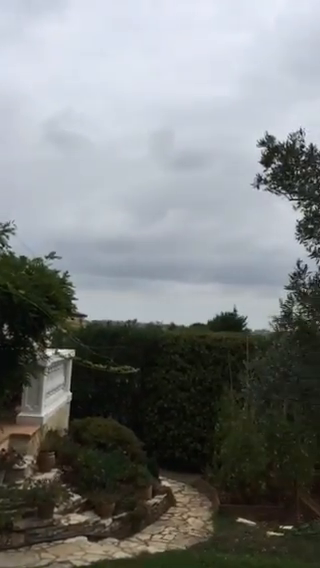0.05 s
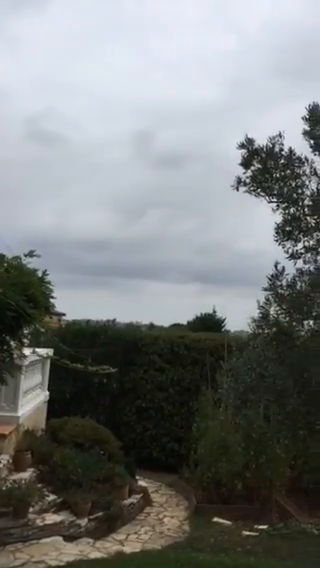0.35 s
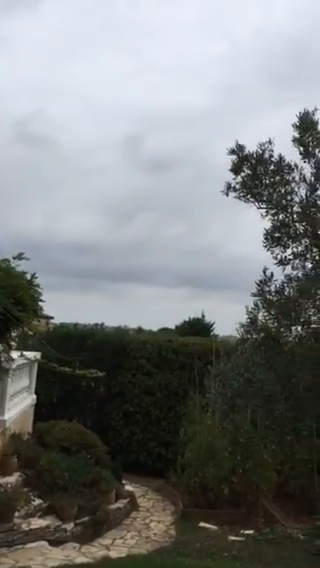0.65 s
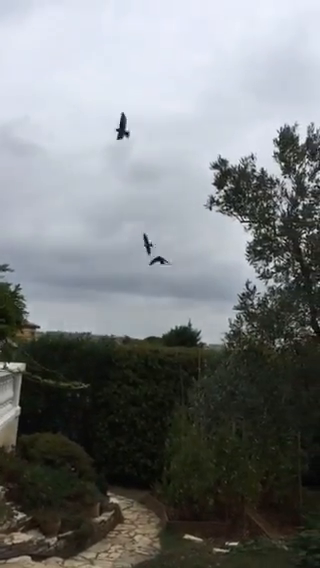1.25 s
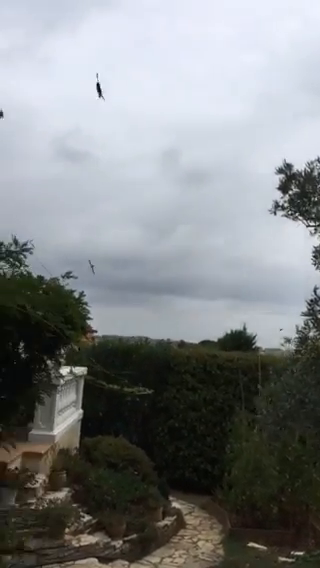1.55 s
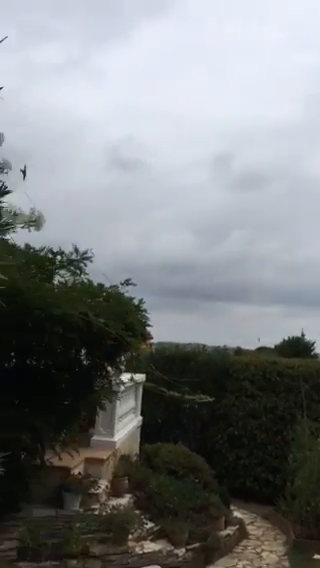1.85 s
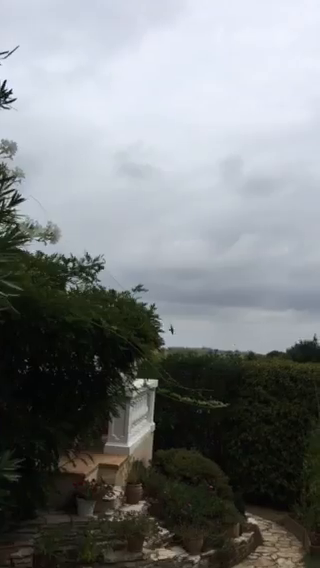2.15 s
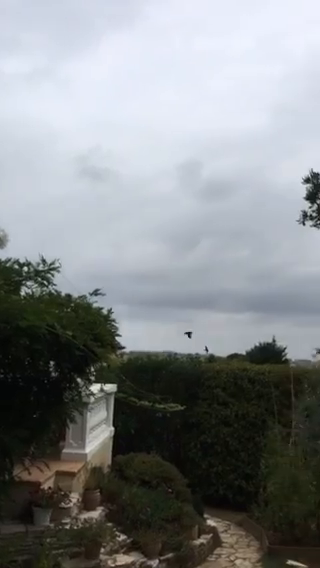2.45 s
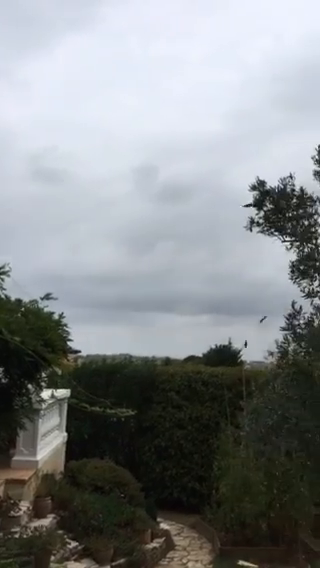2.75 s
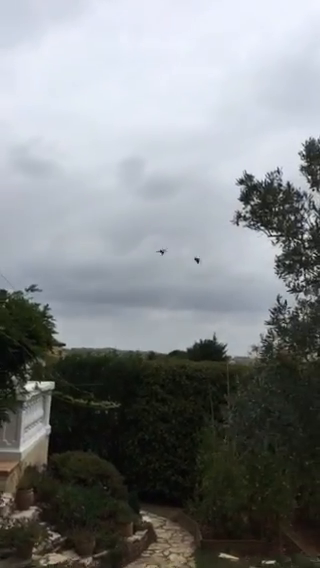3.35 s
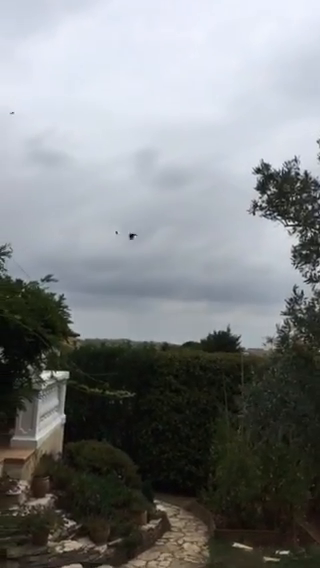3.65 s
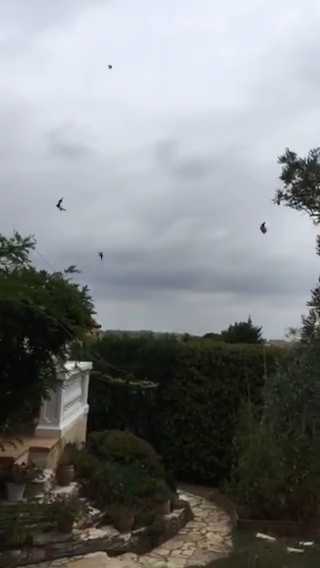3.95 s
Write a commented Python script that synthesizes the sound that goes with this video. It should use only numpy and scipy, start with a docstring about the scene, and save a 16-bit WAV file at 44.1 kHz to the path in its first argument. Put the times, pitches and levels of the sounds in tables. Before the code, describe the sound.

A small nearby bird gives three sharp rising chirps in a garden, at about 1.2, 1.4 and 2.4 seconds. Low wind rumbles and softly thumps the microphone from the start, strongest near 1.1 seconds and easing by 1.5. Another bird answers with faint, thin falling calls around 2.1, 2.8 and 3.4 seconds. Distant birds twitter quietly, mostly in the last second, over a soft steady hush.

```python
"""Wind rumbles over a soft, distant hush and thumps the microphone, each puff ringing a low resonance.
Leaves rustle faintly and small birds twitter far off. A near bird gives three sharp rising chirps,
the two sides of its syrinx sounding together and mixing into combination tones; another answers
with thin falling calls. Garden walls reflect the birdsong, and hedge and trees scatter it."""
import sys
import numpy as np
from scipy import signal
from scipy.fft import rfft, irfft
from scipy.io import wavfile
from scipy.ndimage import uniform_filter1d

SR = 44100
rng = np.random.default_rng(int(sys.argv[2]) if len(sys.argv) > 2 else 0)


def master_out(mix):
    """Clip the mix to full scale and print it as 16-bit PCM to the path in sys.argv[1]."""
    frames = np.transpose(np.atleast_2d(mix))
    ceiling = np.clip(frames, -1, 1)
    pcm = np.round(ceiling * 32767).astype(np.int16)
    wavfile.write(sys.argv[1], SR, pcm)


N = 176400


def gain(db):
    """Amplitude ratio of a level: a factor of ten for every 20 dB."""
    return 10 ** (np.asarray(db) / 20)


def curve(t, rows, column=1):
    """Linear interpolation of one column of a table."""
    rows = np.array(rows, float)
    return np.interp(t, rows[:, 0], rows[:, column])


def tint(x, spectrum):
    """Zero-phase filtering by (frequency [Hz], gain [dB]) points on a logarithmic frequency axis."""
    hz, db = np.array(spectrum, float).T
    bins_hz = np.maximum(np.fft.rfftfreq(N, 1 / SR), 1)
    return irfft(rfft(x) * gain(np.interp(np.log(bins_hz), np.log(hz), db)), N)


def noise(spectrum):
    """Spectral shaping of white noise, scaled to unit rms."""
    y = tint(rng.standard_normal(N), spectrum)
    return y / y.std()


def wobble(t, rate_hz):
    """Random modulation: straight lines between Gaussian values of unit spread."""
    return np.interp((t - t[0]) * rate_hz, np.arange(2048), rng.standard_normal(2048))


def phase(hz):
    """Phase as the time integral of a lightly smoothed frequency."""
    return 2 * np.pi * np.cumsum(uniform_filter1d(hz, size=150)) / SR


def add(out, start_s, x):
    """Superposition: x sums into out from a given time."""
    index = int(start_s * SR) + np.arange(len(x))
    inside = (index >= 0) & (index < N)
    out[index[inside]] += x[inside]


# Strength of the wind between puffs (time [s], level [dB])
BREEZE_LEVELS = [(0, -43.5), (.3, -41.5), (.42, -57.5), (.54, -54.5), (.67, -60), (.78, -53), (.9, -51.5),
                 (1.02, -59), (1.15, -33.5), (1.22, -47), (1.32, -41.5), (1.39, -56), (1.47, -51.5),
                 (1.6, -61.5), (2.55, -57.5), (2.63, -53), (2.72, -60), (2.82, -53), (2.95, -60.5),
                 (4, -60.5)]
# Spectrum of its rumble (frequency [Hz], relative level [dB])
BREEZE_SPECTRUM = [(20, -22), (35, -9), (50, 0.5), (64, -1.5), (90, -10), (150, -14.5), (250, -34.5),
                   (600, -87)]

def breeze(t):
    """Turbulent pressure fluctuations at the microphone make a low rumble."""
    return noise(BREEZE_SPECTRUM) * gain(curve(t, BREEZE_LEVELS))


# Strength of the distant background (time [s], level [dB])
HUSH_LEVELS = [(0, -54.5), (1.0, -55), (1.6, -56), (2.8, -56), (4, -57)]
# Its spectrum (frequency [Hz], relative level [dB])
HUSH_SPECTRUM = [(120, -25), (200, -3), (253, -4.5), (399, -2.5), (534, -7.5), (677, -5.5), (769, -6.5),
                 (1010, -5), (1810, -14), (2130, -18), (2510, -22), (3750, -29.5), (4840, -35),
                 (8980, -38.5), (15500, -44.5)]

def hush(t, flicker_db=.5):
    """Ambient noise, mostly low and middle frequencies, under slight amplitude modulation."""
    return noise(HUSH_SPECTRUM) * gain(curve(t, HUSH_LEVELS) + flicker_db * wobble(t, 9))


# Puffs on the microphone (time [s], peak level [dB], pulse half-length [s])
WIND_PUFFS = [(0.017, -27.5, 0.0036), (0.048, -32, .004), (0.089, -31.5, 0.0043), (0.129, -30, 0.003),
              (.182, -28, 0.0051), (.205, -33, 0.0022), (.253, -26.5, 0.0033), (0.329, -25.5, 0.0044),
              (0.359, -36.5, 0.003), (0.607, -40, 0.0064), (.72, -39, 0.011), (0.76, -32, 0.0037),
              (0.781, -39, 0.0043), (0.934, -32, 0.0048), (1.054, -30, 0.0029), (1.123, -20, 0.0049),
              (1.242, -32, 0.0034), (1.274, -28.5, .004)]

def wind_puffs(t, port_hz=65.8, t60_s=0.095, cut_hz=55, turbulence=.15):
    """Damped resonance: each brief drop in pressure rings the low end of the microphone."""
    out, age = np.zeros(N), t[:SR // 4]
    ring = gain(-60 * age / t60_s) * np.cos(2 * np.pi * port_hz * age)
    ring = signal.sosfilt(signal.butter(2, cut_hz, "high", fs=SR, output="sos"), ring)
    for at, db, half_s in WIND_PUFFS:
        thump = signal.fftconvolve(ring, -np.hanning(int(2 * half_s * SR)))
        add(out, at - half_s / 2, gain(db) * thump / np.abs(thump).max())
    return out * (1 + turbulence * wobble(t, 150))


# Strength of the rustle (time [s], level [dB])
LEAF_LEVELS = [(0, -88), (.28, -81), (.4, -86), (.54, -74), (.68, -78.5), (.84, -72.5), (1.0, -77.5),
               (1.3, -81), (2, -79), (4, -89)]
# Its spectrum (frequency [Hz], relative level [dB])
LEAF_SPECTRUM = [(1200, -1.5), (2700, 5), (4000, -0.5), (5000, -11.5), (6500, -4), (8000, -20.5),
                 (12000, -15.5), (15500, -15)]

def leaves(t, flicker_db=2):
    """Rustling leaves radiate broadband noise with rapid amplitude modulation."""
    return noise(LEAF_SPECTRUM) * gain(curve(t, LEAF_LEVELS) + flicker_db * wobble(t, 44))


# Sweep of the two voices, before stretching (time from its top [s], low voice [ratio to top pitch],
# its level [dB], high voice [ratio to top pitch], its level [dB])
SWEEP = [(-.056, .68, -43, .9, -43), (-.042, .615, -21, .83, -34), (-.031, .622, -21, 0.94, -26),
         (-.022, .665, -14, .87, -22), (-.015, .745, -9.5, .95, -17), (-.009, .845, -0.5, 1.05, -7.5),
         (-.003, 0.98, -2, 1.19, -8.5), (.0015, 1.0, 0.5, 1.26, -10), (.005, .94, -14, 1.30, -11),
         (.012, .72, -38, 1.23, -19)]
# Overtones and combination tones (low voice [multiple], high voice [multiple], base level [dB])
MIXED_TONES = [(2, 0, -20.5), (1, 1, -23), (3, 0, -26), (-1, 2, -27), (2, 1, -33), (4, 0, -33), (5, 0, -37)]

def syrinx(top_hz, stretch, roughness, air, flutter_hz=1100, jitter=.035, blur_rad=2.2, rasp_db=-17):
    """Nonlinear mixing of two rising voices; returns the start [s] relative to the top, and the chirp."""
    t = np.arange(SWEEP[0][0] * stretch, SWEEP[-1][0] * stretch, 1 / SR)
    low, low_db, high, high_db = (curve(t / stretch, SWEEP, column=k) for k in range(1, 5))
    hoarse = roughness + 0.53 * (t / t[0]) ** 2  # roughest at the onset
    low_phase = phase(top_hz * low * (1 + jitter * hoarse * wobble(t, flutter_hz)))
    high_phase = phase(top_hz * high * (1 + jitter * hoarse * wobble(t, flutter_hz)))
    y = gain(low_db) * np.sin(low_phase)
    y += gain(high_db) * np.sin(high_phase + hoarse * wobble(t, flutter_hz))
    # mixed tones and rasp swell with the low voice, but less steeply
    for m, n, db in MIXED_TONES:
        blur = blur_rad * hoarse * wobble(t, flutter_hz)
        y += gain(db + 0.51 * low_db) * np.sin(m * low_phase + n * high_phase + blur)
    y = np.sqrt(2) * y * (1 + roughness * wobble(t, flutter_hz))
    rasp = np.roll(air, rng.integers(N))[:len(t)]
    y += gain(rasp_db + 0.32 * low_db) * rasp
    return t[0], y * signal.windows.tukey(len(t), .1)


# Rasp of air in any rising chirp (frequency [Hz], relative level [dB])
RASP_SPECTRUM = [(2200, -20), (3200, -3), (4500, -2), (5800, -5), (7200, -6), (9300, -11), (10800, -16),
                 (15500, -20)]
# Dulling by distance (frequency [Hz], gain [dB])
DISTANCE_FILTER = [(2000, 8), (4200, 1.5), (5500, -4), (8000, -15)]
# Distant rising chirps (time of sweep top [s], pitch there [Hz], source level [dB])
DISTANT_CHIRPS = [(.298, 4180, -75), (.675, 3830, -75), (2.775, 3600, -77), (2.945, 4060, -69.5),
                  (3.327, 3800, -75.5), (3.603, 4034, -68.5)]

def far_chirps():
    """High-frequency attenuation over distance dulls the slower chirps of far birds."""
    out, air = np.zeros(N), noise(RASP_SPECTRUM)
    for at, hz, db in DISTANT_CHIRPS:
        offset_s, chirp = syrinx(hz, stretch=1.6, roughness=0.22, air=air)
        add(out, at + offset_s, gain(db) * chirp)
    return tint(out, DISTANCE_FILTER)


# Reflections from near walls (delay [s], level [dB])
WALL_ECHOES = [(.0035, -21), (.0075, -12), (.019, -15.5), (.047, -26)]
# Spectrum of the scattered sound (frequency [Hz], relative level [dB])
SCATTER_SPECTRUM = [(2000, 6), (3200, -2.5), (4000, 1.5), (4700, -1.5), (6000, 0), (7200, -5), (9500, -3),
                    (15000, -1.5)]

def garden(x, wet_db, early_t60_s=0.23, late_t60_s=0.45, late_db=-15, build_s=0.0035):
    """Reflection and scattering: wall echoes and a tail from hedge and trees join the direct sound."""
    t = np.arange(N) / SR
    decay = gain(-60 * t / early_t60_s) + gain(late_db - 60 * t / late_t60_s)
    tail = noise(SCATTER_SPECTRUM) * decay * (1 - np.exp(-t / build_s))
    response = tail * gain(wet_db) / np.sqrt(np.sum(tail ** 2))
    for delay, db in WALL_ECHOES:
        add(response, delay, gain([db]))
    return x + signal.fftconvolve(x, response)[:N]


# Short distant chips (start time [s], centre pitch [Hz], source level [dB])
DISTANT_CHIPS = [(1.07, 2698, -69.5), (1.085, 2060, -66), (1.528, 2935, -66.5), (1.695, 2700, -71.5),
                 (2.865, 2650, -69), (2.983, 3310, -69), (3.095, 3010, -69.5), (3.168, 2780, -73),
                 (3.278, 2700, -69), (3.397, 2850, -68), (3.516, 2790, -69), (3.639, 2940, -68),
                 (3.763, 2700, -71.5)]

def far_chips(length_s=0.0264, fall=0.13, jitter=.13, upper_ratio=1.3, upper_db=-4):
    """Random frequency modulation makes the far birds' falling two-voiced chips hoarse."""
    out = np.zeros(N)
    t = np.arange(int(length_s * SR)) / SR
    for at, hz, db in DISTANT_CHIPS:
        low_phase = phase(hz * (1 + fall * (.5 - t / length_s) + jitter * wobble(t, 895)))
        voices = np.sin(low_phase) + gain(upper_db) * np.sin(upper_ratio * low_phase)
        add(out, at, gain(db) * np.sin(np.pi * t / length_s) * voices)
    return tint(out, DISTANCE_FILTER)


# Near chirps (time of sweep top [s], pitch there [Hz], source level [dB], stretch [x], roughness [0-1])
NEAR_CHIRPS = [(1.1754, 4790, -40, 1.03, .28), (1.4276, 4686, -39, 1.03, 0.23),
               (2.3811, 4560, -39.5, .98, 0.03)]
# Tone colour of the near chirps, with dips near 7 and 10.7 kHz (frequency [Hz], gain [dB])
NEAR_COLOUR = [(2500, 0.5), (6200, -0.5), (7200, -10.5), (8400, -3.5), (9600, 1), (10700, -4.5),
               (13000, -3), (15500, -2)]

def near_bird():
    """Spectral shaping: three sharp chirps close by, with two dips in their treble."""
    out, air = np.zeros(N), noise(RASP_SPECTRUM)
    for at, hz, db, stretch, roughness in NEAR_CHIRPS:
        offset_s, chirp = syrinx(hz, stretch, roughness, air)
        add(out, at + offset_s, gain(db) * chirp)
    return tint(out, NEAR_COLOUR)


# Thin falling calls (start time [s], final pitch [Hz], level [dB], duration [s])
FALLING_CALLS = [(1.522, 6130, -74, 0.0255), (2.064, 6000, -67, 0.027), (2.805, 6020, -62.5, 0.0343),
                 (3.427, 5990, -62.5, 0.0406)]

def answering_bird(fall=0.12, bend=1.53, jitter=.011, upper_ratio=1.125, upper_db=-7):
    """Biphonation: two high voices, wavering independently, slide down and level out."""
    out = np.zeros(N)
    for at, hz, db, length_s in FALLING_CALLS:
        t = np.arange(int(length_s * SR)) / SR
        progress = t / length_s
        pitch = hz * (1 + fall * (1 - progress) ** bend)
        lower = np.sin(phase(pitch * (1 + jitter * wobble(t, 1180))))
        upper = np.sin(phase(pitch * upper_ratio * (1 + jitter * wobble(t, 1180))))
        envelope = np.sin(np.pi * progress ** 1.1) ** 0.81
        add(out, at, gain(db) * envelope * (lower + gain(upper_db) * upper))
    return out


def scene():
    """Superposition of reverberant birdsong, wind and background in one channel."""
    t = np.arange(N) / SR
    birds = garden(near_bird(), wet_db=-8)
    birds += garden(answering_bird(), wet_db=1)
    birds += garden(far_chirps() + far_chips(), wet_db=-3.5)
    return (birds + wind_puffs(t) + breeze(t) + hush(t) + leaves(t))[None]


def record(dry):
    """Band limiting: a steep low-pass filter removes the treble above 15750 Hz."""
    return signal.sosfilt(signal.ellip(10, .2, 70, 15750, fs=SR, output="sos"), dry)


dry = scene()
out = record(dry)
master_out(out)
```